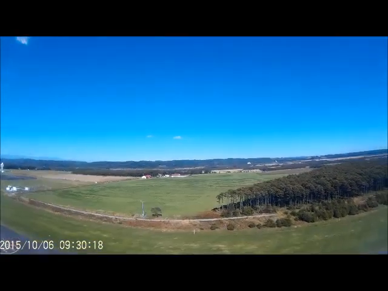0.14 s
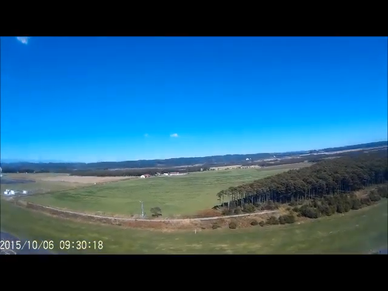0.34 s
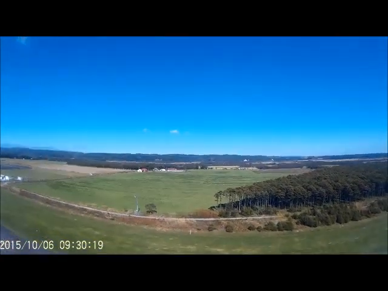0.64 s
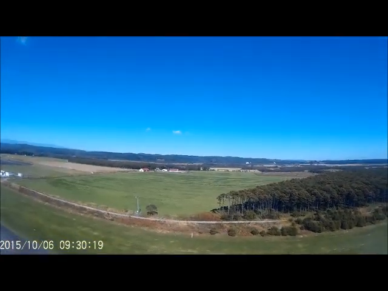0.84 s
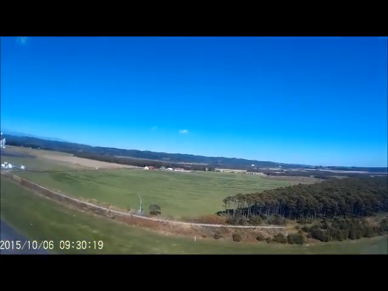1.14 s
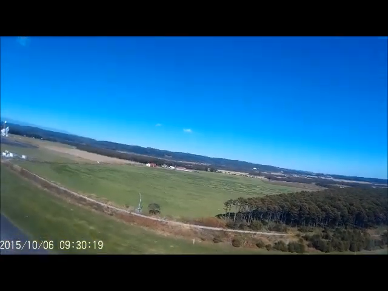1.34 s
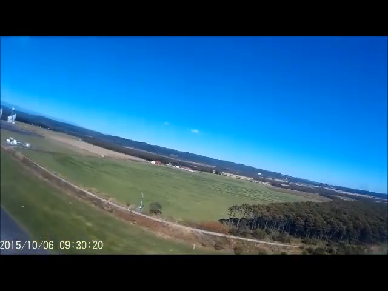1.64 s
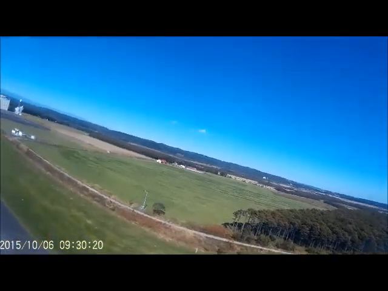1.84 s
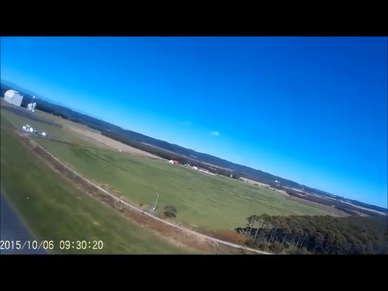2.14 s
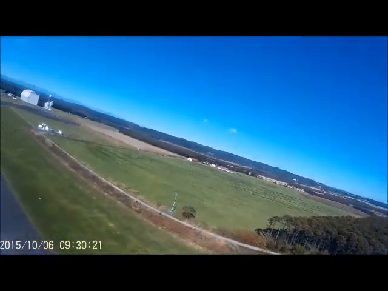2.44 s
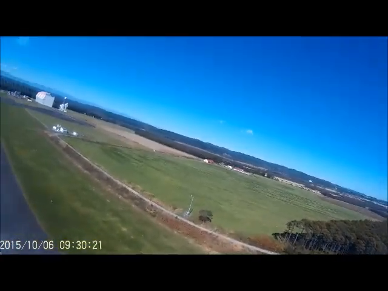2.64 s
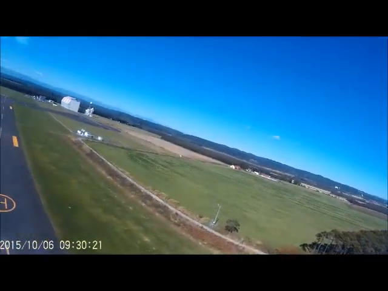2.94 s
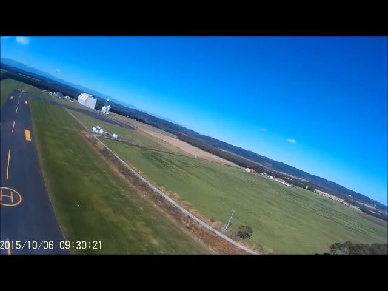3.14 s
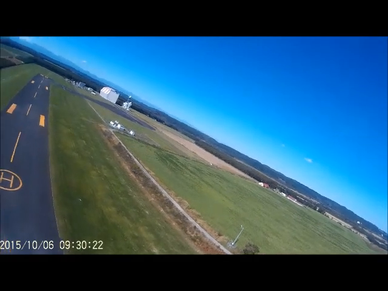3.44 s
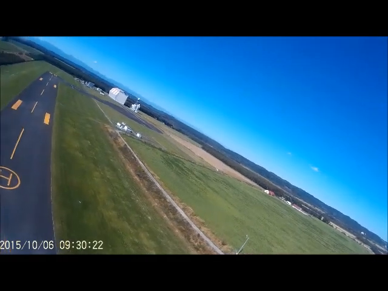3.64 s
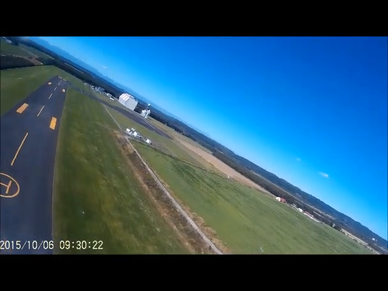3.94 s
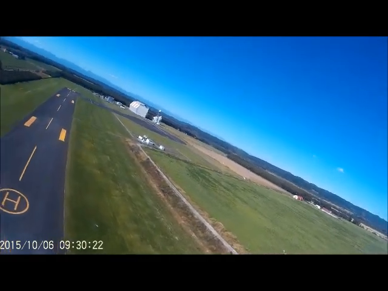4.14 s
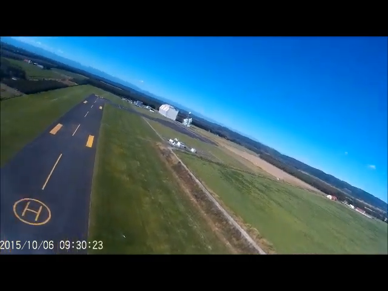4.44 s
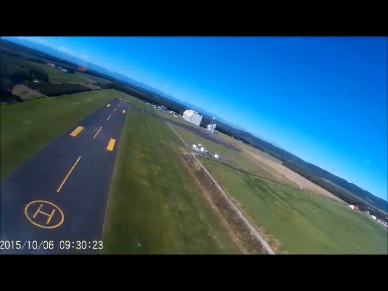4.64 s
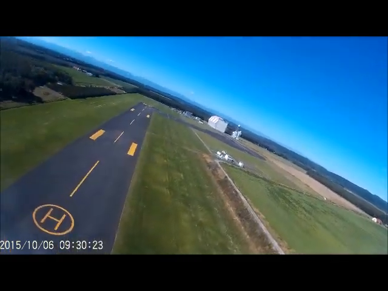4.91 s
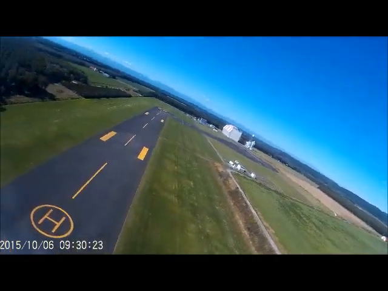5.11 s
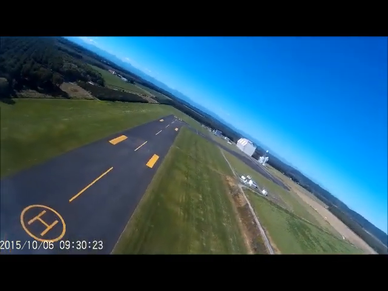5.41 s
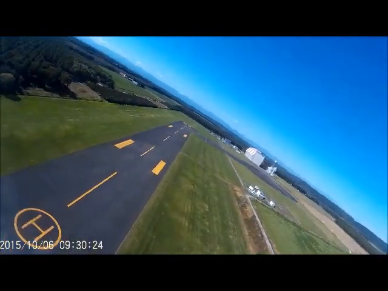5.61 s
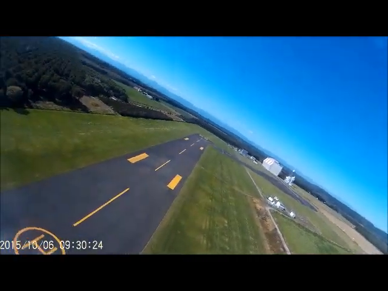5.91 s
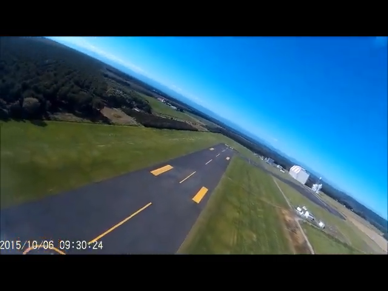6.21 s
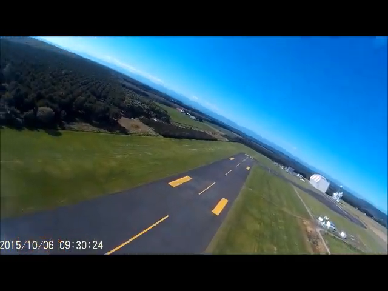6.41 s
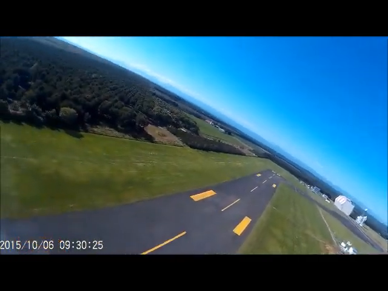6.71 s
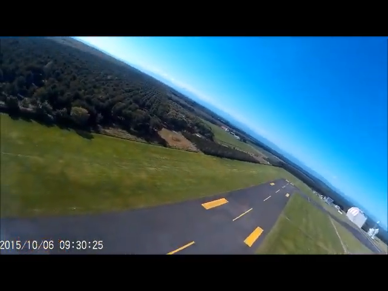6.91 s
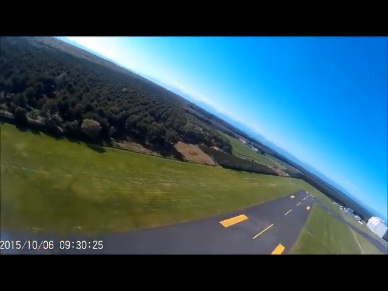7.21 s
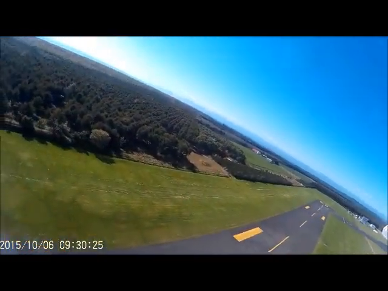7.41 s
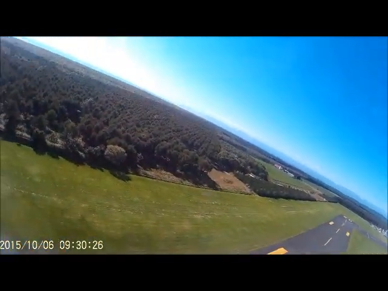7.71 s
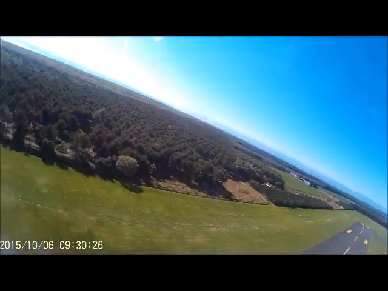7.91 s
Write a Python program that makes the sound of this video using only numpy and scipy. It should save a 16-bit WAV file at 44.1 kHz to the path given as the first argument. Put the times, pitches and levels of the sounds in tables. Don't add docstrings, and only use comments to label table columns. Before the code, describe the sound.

Close, buzzing propeller drone with thin motor whine wavers restlessly, settles to a lower pitch, amid low airflow roar, faint ticks and two soft knocks.

```python
import sys
import numpy as np
from scipy import signal
from scipy.io import wavfile
from scipy.ndimage import uniform_filter1d, map_coordinates

SR = 44100
rng = np.random.default_rng(int(sys.argv[2]) if len(sys.argv) > 2 else 0)


def boost(x):
    u = np.asarray(x, float) / 20
    return 10 ** u


def log_audio(samples):
    frames = np.atleast_2d(samples).T
    limited = np.clip(frames, -1, 1)
    pcm = np.round(limited * 32767).astype(np.int16)
    wavfile.write(sys.argv[1], SR, pcm)


N = 355446
TIME = np.arange(N) / SR
POLES = 14
SPEEDS_HZ = (1215, 1250, 1300, 1390, 1445)


def unit(x):
    return x / np.sqrt(np.mean(np.abs(x) ** 2) + 1e-20)


def wobble(rate):
    knots = rng.standard_normal(N // 200)
    coarse = TIME[::32]
    return np.interp(TIME, coarse, map_coordinates(knots, [coarse * rate]))


def humps(rows):
    return sum(height * np.exp(-((TIME - s) / spread) ** 2 / 2) for s, spread, height in rows)


def speed():
    # columns t/s, magnet-passing pitch the motor settles on f/Hz (14 x shaft speed)
    throttle = [(0.05, 1388.0), (0.16, 1445.0), (0.55, 1455.0), (0.64, 1397.0), (0.86, 1383.0),
                (1.06, 1413.0), (1.17, 1444.0), (1.77, 1384.0), (2.17, 1451.0), (2.23, 1407.0),
                (2.36, 1484.0), (2.44, 1413.0), (2.63, 1372.0), (2.86, 1412.0), (2.93, 1385.0),
                (3.15, 1413.0), (3.39, 1350.0), (3.63, 1317.0), (3.9, 1280.0), (4.27, 1247.0),
                (4.42, 1227.0), (4.82, 1246.0), (5.03, 1241.0), (5.48, 1253.0), (5.68, 1234.0),
                (6.04, 1213.0), (6.84, 1256.0), (7.28, 1286.0), (7.36, 1245.0), (7.53, 1225.0)]
    start_hz, spin_up_s, run_down_s = 1354, 0.039, 0.078
    times, targets = np.transpose(throttle)
    pitch = np.full(N, float(start_hz))
    for s, change in zip(times, np.diff(targets, prepend=start_hz)):
        lag = spin_up_s if change > 0 else run_down_s
        u = np.clip(TIME - s, 0, None) / lag
        pitch += change * (1 - (1 + u) * np.exp(-u))
    hunting_hz = np.interp(pitch, SPEEDS_HZ[1::2], (2.2, 0.5))
    return pitch + hunting_hz * wobble(9)


def shaft(pitch):
    return 2 * np.pi * np.cumsum(pitch / POLES) / SR


def blade_load():
    # columns t/s, blade-passing tone level/dB
    banking = [(0, -27.5), (.32, -35), (.72, -30), (.97, -24), (1.2, -31.5), (1.5, -24), (1.85, -26.5),
               (2.3, -25), (2.56, -18.5), (2.97, -22), (3.45, -26), (3.9, -29), (4.55, -21), (4.75, -37.5),
               (5.5, -35.5), (5.95, -26.5), (6.7, -30.5), (8.06, -31)]
    # columns centre t/s, spread/s, depth level/dB
    lulls = [
        (.1, 0.05, 7),
        (1.6, 0.024, 12),
        (2.04, 0.023, 15),
        (2.72, 0.068, 3),
        (3.18, 0.072, 11.5),
        (3.56, 0.099, 21),
        (3.77, 0.052, 6.5),
        (6.77, 0.032, 3),
        (6.99, 0.11, 11.5),
        (7.52, 0.048, 0),
    ]
    s, db = np.transpose(banking)
    return np.interp(TIME, s, db) - humps(lulls)


def levels(pitch, load_db):
    response = {1: (-62.5, -57, -46, -40, -42), 3: (-39.5, -41.5, -54, -48.5, -36),
                4: (-26, -25.5, -30, -34, -36.5), 5: (-35.5, -35.5, -36, -49, -41),
                6: (-35.5, -40.5, -48.5, -53, -57), 8: (-58, -56.5, -57, -55, -64),
                10: (-55, -64, -55, -59.5, -47), 11: (-55, -54.5, -54, -58.5, -54),
                12: (-50, -54, -52, -44, -44.5), 13: (-52, -53, -64.5, -43.6, -42),
                14: (-34, -33.4, -33.5, -39.5, -38.5)}
    follows = {1: (.01, .01, 1.2), 3: (-0.18, .05, 0.89), 4: (.45, .4, 0.93), 5: (0.16, 0.25, 2.2),
               6: (1, 0.49, 1.1), 8: (.7, .6, 1), 10: (.5, 0.11, 1.2), 11: (.4, 0.33, 1.5),
               12: (0.27, .02, 1), 13: (0.087, .1, 0.84), 14: (.03, .02, .4)}
    usual_db, least_db = -28, -40
    extra = np.maximum(load_db, least_db) - usual_db
    out = {2: load_db}
    for k, (slow, fast, drift) in follows.items():
        share = np.interp(pitch, SPEEDS_HZ[1::2], (slow, fast))
        out[k] = np.interp(pitch, SPEEDS_HZ, response[k]) + share * extra + drift * wobble(4)
    return out, extra


def tone(angle, db, rough, rate, order):
    timing = {1: -2.2, 2: -1.6, 3: -2.7, 4: 0, 5: 1, 6: -1.4, 8: -1, 12: -1.2, 13: -1, 14: -1}
    gusts = 1 + rough * (wobble(rate) + 1j * wobble(rate))
    turning = np.exp(1j * (order * angle + timing.get(order, order)))
    return np.sqrt(2) * boost(db) * np.real(unit(gusts) * turning)


def propeller(angle, db):
    # columns centre t/s, spread/s, level/dB
    sharpness = [
        (.62, 0.088, -10.5),
        (1.27, 0.054, -3.5),
        (4.3, 0.21, -1),
        (5.2, 0.23, 1),
        (5.9, .3, 2.5),
        (7.6, 0.17, 2),
    ]
    even = tone(angle, db[2], 0.12, 25, order=2)
    even += tone(angle, db[4] + humps(sharpness), 0.06, 30, order=4)
    even += tone(angle, db[6], 0.06, 25, order=6)
    odd = tone(angle, db[1], 0.08, 15, order=1)
    odd += tone(angle, db[3], 0.08, 15, order=3)
    odd += tone(angle, db[5], 0.24, 30, order=5)
    return even + odd


def motor(angle, db):
    minor = {7: (-55, 0.27), 9: (-59, 0.7), 15: (-57, 0.35), 16: (-59, 0.33), 18: (-61, 0.44),
             42: (-88.5, -0.3)}
    # columns centre t/s, spread/s, level/dB
    ringing = [
        (.66, 0.071, 9),
        (2.83, .08, 5),
        (4.2, .12, 10),
        (4.5, 0.18, 8.5),
        (7.44, 0.088, 9),
    ]
    whine = tone(angle, db[14], 0.083, 40, order=14)
    whine += tone(angle, db[12], 0.037, 16, order=12)
    whine += tone(angle, db[13], 0.15, 18, order=13)
    ringing_db = humps(ringing)
    whine += tone(angle, db[8] + ringing_db, 0.12, 15, order=8)
    whine += tone(angle, db[10], 0.12, 15, order=10)
    whine += tone(angle, db[11] + ringing_db, 0.12, 15, order=11)
    swing = db[6] + 45
    for k, (level_db, share) in minor.items():
        whine += tone(angle, level_db + share * swing, 0.38, 6, order=k)
    return whine


def peaks(modes, hz):
    power = 0
    for centre, width, db in modes:
        power = power + boost(2 * db) / (1 + (2 * (hz - centre) / width) ** 2) ** 2
    return np.sqrt(power)


def roar(modes, patchy_db):
    hz, _, z = signal.stft(rng.standard_normal(N), SR, nperseg=4096)
    patches = unit(uniform_filter1d(rng.standard_normal(z.shape), size=9, axis=0))
    z = z * boost(patchy_db * patches) * peaks(modes, hz)[:, None]
    return unit(signal.istft(z, nperseg=4096)[1][:N])


def slipstream(angle, pitch, extra):
    # columns t/s, level over its rest/dB
    bumps = [(.05, 6), (.47, 13.5), (1.33, 9), (1.98, 7), (2.33, 5), (2.82, 13.5), (3.72, -1), (4.13, 4),
             (4.501, 5), (5.249, 6.5), (6.12, 10), (6.4, 9.5), (6.7, 9.5), (7.2, 3.5), (7.58, 11.5),
             (7.85, 7), (8.05, 2.5)]
    # columns f/Hz, width/Hz, level/dB
    frame_modes = [(52.3, 42, -16.5), (128, 21, -10.5), (211.8, 62.4, -2), (264.2, 16, -1), (343, 70, -11),
                   (419.6, 68, -6), (499.7, 88, -9.5)]
    shell_modes = [(633, 66, -1), (761, 95, -2.5), (869, 100, -5), (1010, 76, 1)]
    case_modes = [(1268, 330, 5), (1490, 470, -2), (1623, 300, -2), (1868, 320, -9)]
    treble_modes = [(2230, 110, -1.5), (2970, 650, 1), (3930, 800, -4.5), (4980, 1200, -12)]
    middle_hz = SPEEDS_HZ[1:-1]
    frame_db = np.interp(pitch, middle_hz, (-31.5, -34, -33.5)) + 0.04 * extra
    shell_db = np.interp(pitch, middle_hz, (-46, -47, -46.5)) + 0.3 * extra
    case_db = np.interp(pitch, middle_hz, (-42.5, -42.5, -45.5)) + 0.08 * extra
    treble_db = -64.0 + 0.44 * (case_db + 39.5) + 0.092 * extra
    wing_db = -47 + humps((s, 0.07, db) for s, db in bumps)
    wing = tone(2 * np.pi * 47 * TIME, wing_db, 0.7, 26, order=1)
    throb = 1 + 0.099 * np.cos(2 * angle) + 0.017 * np.cos(angle)
    frame = boost(frame_db) * roar(frame_modes, patchy_db=0.13)
    shell = boost(shell_db) * throb * roar(shell_modes, patchy_db=1.6)
    case = boost(case_db) * throb * roar(case_modes, patchy_db=0.8)
    treble = boost(treble_db) * throb * roar(treble_modes, patchy_db=1.3)
    return wing + frame + shell + case + treble


def controller(angle, pitch):
    beats = [(12, 2), (18, 3), (7.5, 1)]
    beats_db = (-46, -51, -50)
    # silent, full, full, silent [f/Hz]
    band_hz = (1380, 1540, 1690, 1725)
    switching_hz = 7829
    switching = 2 * np.pi * switching_hz * TIME
    out = boost(-92.5) * np.sin(switching)
    for (m, n), db in zip(beats, beats_db):
        heard = np.interp(abs(m * pitch - n * switching_hz), band_hz, (0, 1, 1, 0))
        out += heard * tone(m * POLES * angle - n * switching, db, 0.12, 40, order=1)
    return out


def loose_part(angle):
    # columns centre t/s, spread/s, level/dB
    rattle = [(1.37, 0.011, -72), (1.53, 0.016, -70.5), (1.695, 0.012, -71), (1.845, .015, -72),
              (1.98, .015, -73), (2.46, 0.02, -67), (2.53, .015, -71), (2.6, 0.024, -61.5),
              (2.71, 0.026, -67.5), (2.86, 0.032, -70), (2.925, 0.04, -72.5), (4.13, 0.062, -70.5),
              (4.33, 0.056, -75.5), (4.52, 0.039, -72), (5.52, 0.057, -71.5), (5.95, 0.059, -74),
              (6.08, .04, -75), (6.7, .05, -82), (7.601, 0.11, -73.5)]
    # f/Hz, width/Hz, level/dB
    tick_modes = [(3000, 900, -1.5), (4200, 900, 0), (5070, 900, -0.6), (6600, 1200, -12)]
    at = np.flatnonzero(np.diff(np.floor(angle / np.pi)))
    spells = sum(boost(db) * np.exp(-((at / SR - s) / spread) ** 2 / 2) for s, spread, db in rattle)
    weaker_db = 6 * (np.arange(len(at)) % 2)
    blows = np.zeros(N)
    blows[at] = spells * boost(11 - weaker_db + 2.3 * rng.standard_normal(len(at)))
    swell = signal.fftconvolve(blows, np.hanning(SR // 420))[:N]
    return swell * roar(tick_modes, patchy_db=0.6)


def knocks():
    # columns t/s, peak level/dB, low mode f/Hz, high mode f/Hz
    blows_on_shell = [
        (4.5866, -23.5, 1240, 1570),
        (7.9844, -25, 1300, 1620),
    ]
    out = np.zeros(N)
    for s, db, low_hz, high_hz in blows_on_shell:
        t = TIME - s
        shape = np.exp(-(t / np.where(t < 0, 0.0016, 0.0028)) ** 2)
        ring = np.cos(2 * np.pi * high_hz * t) + 1.1 * np.cos(2 * np.pi * low_hz * t)
        out += boost(db) * shape * ring
    return out


def scene():
    pitch = speed()
    angle = shaft(pitch)
    db, extra = levels(pitch, blade_load())
    drive = propeller(angle, db) + motor(angle, db) + controller(angle, pitch)
    air = slipstream(angle, pitch, extra)
    return (drive + air + loose_part(angle) + knocks())[None]


def low_pass(x):
    return signal.sosfilt(signal.butter(12, 15720, fs=SR, output="sos"), x)


def record(dry):
    hiss = boost(-68.5) * rng.standard_normal(dry.shape)
    held = dry / (1 + abs(dry / 0.38) ** 4) ** (1 / 4)
    held = held * np.clip((TIME[-1] - TIME) / 0.004 + 0.35, 0, 1)
    roll_off = signal.butter(14, 15100, fs=SR, output="sos")
    return low_pass(signal.sosfilt(roll_off, held + hiss))


dry = scene()
out = record(dry)
log_audio(out)
```